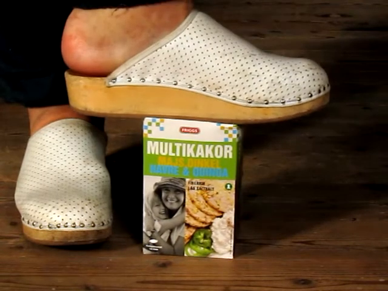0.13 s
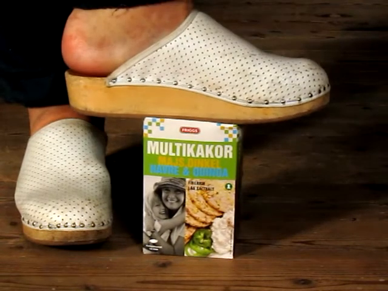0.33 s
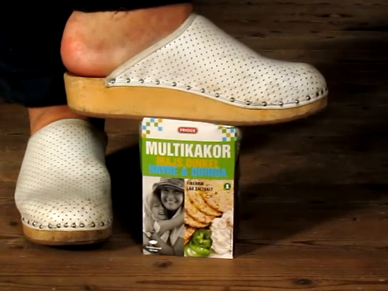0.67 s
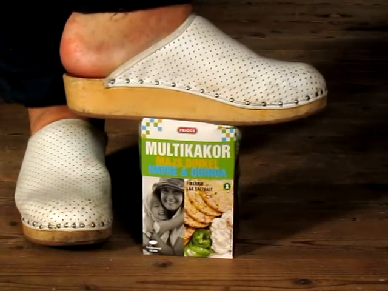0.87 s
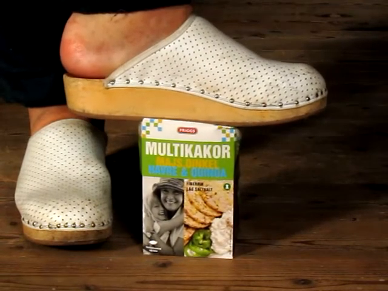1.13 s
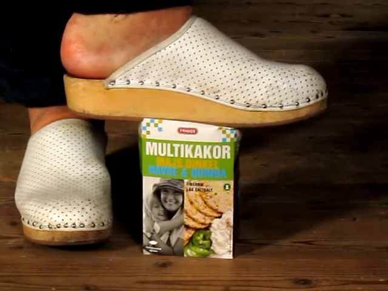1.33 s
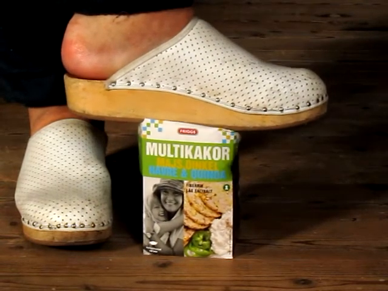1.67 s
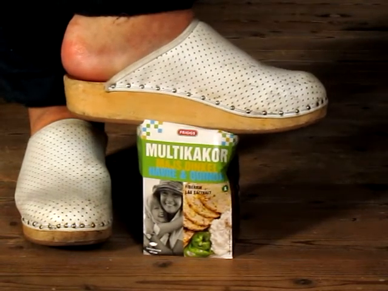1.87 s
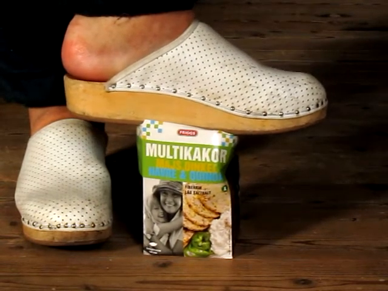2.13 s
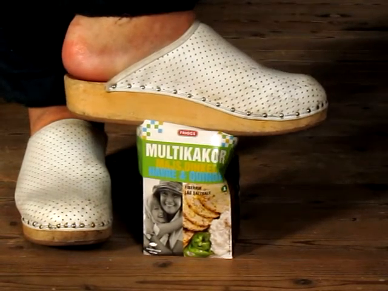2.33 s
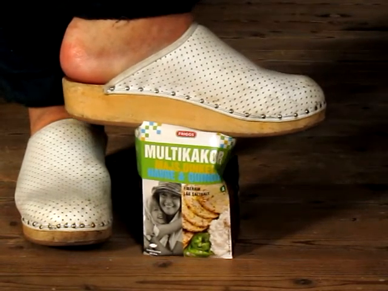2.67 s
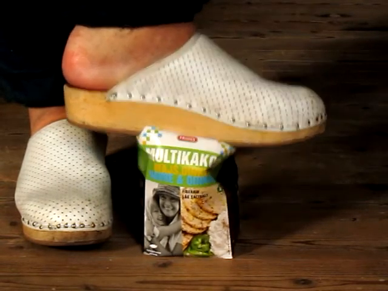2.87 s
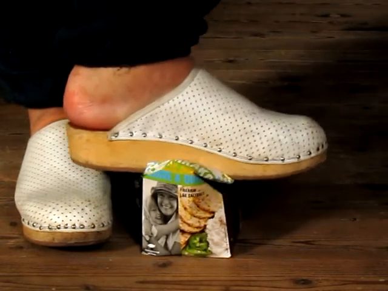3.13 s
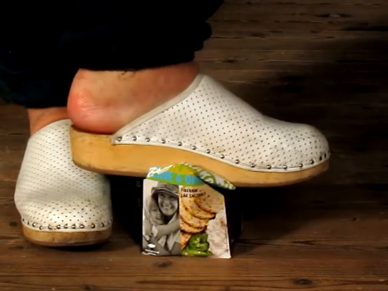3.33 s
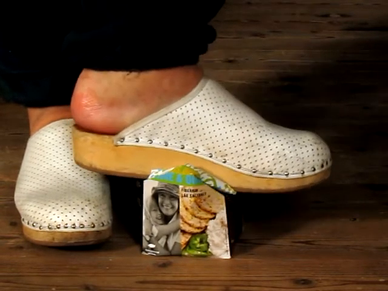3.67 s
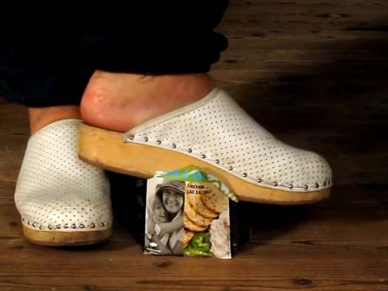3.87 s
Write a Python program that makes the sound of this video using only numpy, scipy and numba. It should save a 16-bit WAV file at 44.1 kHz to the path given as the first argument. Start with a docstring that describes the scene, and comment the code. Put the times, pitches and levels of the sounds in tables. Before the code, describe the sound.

A cardboard box creaks faintly, then crunches and crumples loudly under a slowly pressing wooden clog.

```python
"""On a plank floor in a small room, a wooden clog slowly crushes a small cardboard box close to a stereo camera
microphone. Folds give way in swarms of tiny slips, random clicks that ring the modes of the hollow box.
Single creases snap as short rings, the paper skin crackles and ticks in filtered clicks and noise, and the boards
thud as low decaying sines. Tails of decaying noise answer as the room, over a steady hiss and a wide low rumble."""
import sys
import numpy as np
from scipy import signal
from scipy.fft import rfft, irfft
from scipy.io import wavfile
from scipy.ndimage import uniform_filter1d
from numba import njit

SR = 44100
rng = np.random.default_rng(int(sys.argv[2]) if len(sys.argv) > 2 else 0)


def generate_wav(signal):
    """Clip the signal to [-1, 1] and save it as 16-bit WAV at the path in sys.argv[1]."""
    frames = np.transpose(np.atleast_2d(signal))
    scaled = np.clip(frames, -1, 1) * 32767
    pcm = np.round(scaled).astype(np.int16)
    wavfile.write(sys.argv[1], SR, pcm)


N = 176400  # samples, 4 s

# Modes of the box. Each row: pitch in Hz, relative level in dB, nominal 60 dB decay time in seconds.
BOX_MODES = [(217, -13, 0.063), (290, -2, 0.028), (358, -5, 0.05), (438, -1, 0.061), (585, -3.5, 0.029),
             (762.5, -0.5, 0.027), (921, -4.5, 0.028), (1077, 1, 0.02), (1235, -15, 0.012),
             (1580, -3, 0.01), (1900, -6.5, 0.022), (2255, -8, 0.011), (2628, -15, 0.11),
             (3250, -12, 0.016)]
# Crumpling under the foot, one table a stretch. Each row: time in seconds, level of the middle modes in dB before
# the crumple trim, then the hollow modes, upper modes and paper crackle (before its trim) in dB re the middle.
PUSH_1 = [(0.45, -68, -12, 1, -6), (0.504, -49, 3, -1.5, -16), (0.62, -70, 9, -1, 1)]
CREEP = [(.9, -70, 3.4, 0, -8), (1.04, -63, 4.4, 1.6, -7.5), (1.6, -71.5, 6.8, 0, -7.5)]
PUSH_2 = [(1.619, -66, 8, 5.5, -12), (1.716, -49, 9.5, 6.5, -15.5), (1.816, -51.5, 3, 8, -7.5),
          (1.968, -60.5, 2.5, 0.5, -12), (2.03, -54, 5, 1.5, -14), (2.084, -59.5, 8, -4, -7),
          (2.4, -65, -3, -19, -13), (2.451, -49.5, 2, -8, -27)]
COLLAPSE = [(2.73, -86, 9, -7, -13), (2.754, -49.5, -3.5, -19, -14), (2.842, -55, 14, -12, -7),
            (2.852, -34.5, 10, -3, -21), (2.891, -48, 1, -1, 0.5), (2.897, -35, -2.5, 3, -5),
            (2.932, -33, -8.5, -26, -5.5), (2.967, -30, -2, -6, -13), (3.12, -45, -6, -3.5, -18),
            (3.278, -49.5, -3.5, -9, -15), (3.294, -58, 0, -5, -13), (3.702, -58, 2, 2, -9.5)]
PUSH_4 = [(3.72, -49, -3, -4, -14), (3.762, -46.5, -9, -3.5, -19), (3.79, -32.5, 5, -13, -24),
          (3.798, -23.5, -10, -33, -25), (3.82, -23.5, -8, -24, -23), (3.854, -29, -31, -20, -19),
          (3.884, -37, -14, -4.5, -17.5), (3.981, -54, -26, -12, -14)]
# Creases that snap. Each row: start in seconds, peak in dB before the low cut of the box, favoured pitch in Hz,
# loss in dB one octave off that pitch.
SNAPS = [(.503, -40, 360, 16), (.739, -34.5, 1060, 31), (.739, -37.5, 427, 28), (.738, -44, 2400, 2),
         (1.284, -44, 900, 9), (2.018, -38.5, 1100, 4.5), (2.75, -37.5, 900, 5.5), (2.797, -32, 430, 37),
         (2.85, -19, 420, 5.5), (2.895, -31, 1600, 23), (2.96, -28, 900, 22), (2.967, -19.5, 333, 27),
         (3.415, -46, 900, 20), (3.874, -48, 2060, 20), (3.779, -28.5, 455, -1), (3.787, -33.5, 2640, 62),
         (3.802, -34.5, 2680, 68), (3.7954, -12, 785, 14.5), (3.806, -23, 950, 15), (3.992, -35, 810, 12)]
# Dry ticks of the paper skin. Each row: start in seconds, level in dB before colouring, fizz decay constant in
# seconds.
TICKS = [(1.361, -56, 0.032), (1.954, -53.5, 0.019), (2.457, -53, 0.046), (2.8524, -37.5, 0.0068),
         (2.893, -32, 0.01), (3.8364, -33.5, 0.017)]
# Colour of the paper. Each row: frequency in Hz, relative level in dB per Hz.
PAPER_COLOUR = [(710, -33), (1200, -4.5), (2050, -4.5), (2620, -2.5), (4020, -17), (4830, -9),
                (7810, -13.5), (12900, -33), (15500, -70)]
# Jolts of the sole on the floor boards. Each row: start in seconds, level of each board mode in dB before decay.
THUDS = [(2.845, -40.5), (2.956, -40.5), (3.789, -48)]
# Width of the room tail. Each row: frequency in Hz, side level in dB re the mid.
ROOM_SIDE = [(60, -11.5), (200, -3), (500, -15), (1000, -15), (3000, -5), (8000, 6.5), (15000, 20)]
# Colour of the hiss in the middle. Each row: frequency in Hz, relative level in dB per Hz.
HISS_COLOUR = [(15, -64), (25, -20), (55, -10), (113, -4.5), (156, -5.5), (340, -6), (445, -8),
               (783, -12.5), (1200, -15), (1340, -15), (2930, -21.5), (4150, -31.5), (6050, -26),
               (11200, -42.5), (15500, -64)]
# Colour of the wide rumble, in the side. Each row: frequency in Hz, relative level in dB per Hz.
RUMBLE_COLOUR = [(15, -58), (25, -31), (86, -3), (313, -0.5), (582, -9), (1950, -21.5), (3930, -34.5),
                 (6380, -33), (15500, -59.5)]

# Crumpling
CRUMPLE_DB, BURST_DB, MODE_WALK_DB = -2.5, 1, 1.6  # trim; swell shared by all modes; swell of each mode
SLIPS_PER_S, SLIP_SCATTER_DB = 2500, 2.2
SLIP_CYCLES = 25.5  # a folding wall takes at most this many cycles to fall 60 dB
PITCH_WANDER = .03  # share by which the modes drift while the walls deform
BOX_LOW_HZ = 127  # low cut of the box walls

SNAP_RISE_S, SNAP_SCATTER_DB, SNAP_RING = 0.0004, 3.5, 1.24  # build-up; spread of modes; decay re the table
CRACKS_PER_S, CRACK_SCATTER_DB, CRACKLE_DB = 5000, 2.4, 4
TICK_BRIGHT = 0.7  # treble tilt of the fizz, 0 flat to 1 brightest
PLANK_LOW_HZ, PLANK_HIGH_HZ, PLANK_T60_S, PLANK_RISE_S = 102.4, 162, 0.33, 0.0028

ROOM_T60_S, ROOM_DB, ROOM_DULL_HZ, ROOM_DELAY_S = 0.24, -12.5, 5230, 0.00443
HISS_DB, RUMBLE_DB, FLICKER_DB = -54.5, -46, .6
TOP_HZ = 15500


def undb(db):
    """Turn dB into amplitude."""
    return 10 ** (np.asarray(db) / 20)


def unit(x):
    """Scale to rms 1."""
    return x / np.sqrt(np.mean(x ** 2))


def colour(x, points):
    """Filter along a curve of (Hz, dB) points, straight on a log frequency axis."""
    point_hz, point_db = np.array(points, float).T
    hz = np.maximum(np.arange(len(x) // 2 + 1) * SR / len(x), 1)
    curve_db = np.interp(np.log(hz), np.log(point_hz), point_db, left=-70)
    return irfft(rfft(x) * undb(curve_db), len(x))


def walk(rate):
    """Random levels, each held 1 / rate seconds and slewed to the next; spread near 1."""
    hold = int(SR / rate)
    steps = np.repeat(rng.standard_normal(N // hold + 1), hold)
    return uniform_filter1d(steps, hold)[:N] * 1.2


def clicks(rate, scatter_db):
    """Random clicks of either sign, a few much larger than most; rms 1."""
    when, sign, size = rng.random((int(rate * N / SR), 3)).T
    out = np.zeros(N)
    out[(when * N).astype(int)] = np.sign(sign - .5) * undb(-scatter_db * np.log(1.002 - size))
    return unit(out)


@njit
def resonate(x, turn):
    """A decaying phasor whose pitch may move every sample; a unit click rings at amplitude 1."""
    y, z = np.empty(len(x)), 0j
    for i in range(len(x)):
        z = z * turn[i] + x[i] + 1e-18  # the tiny offset keeps silence numerically cheap
        y[i] = z.imag
    return y


def pushes():
    """The foot's pressure as gains over time: hollow, middle and upper modes, then paper crackle."""
    t = np.arange(N) / SR
    gains = np.zeros((4, N))
    for rows in (PUSH_1, CREEP, PUSH_2, COLLAPSE, PUSH_4):
        s, db, hollow, upper, crackle = np.array(rows, float).T
        fade = np.clip(np.minimum(t - s[0], s[-1] - t) / .01, 0, 1)  # 10 ms in and out
        levels_db = [np.interp(t, s, v) for v in (db + hollow, db, db + upper, db + crackle)]
        gains += fade * undb(levels_db)
    return gains


def crumple(gains):
    """Swarms of slips ring the box; each mode drifts, swells and fades as the folds move."""
    rung, power = np.zeros((3, N)), np.zeros((3, 1))
    bursts_db = BURST_DB * walk(250)
    for hz, db, t60 in BOX_MODES:
        group = np.searchsorted((650, 1400), hz)  # edges in Hz between hollow, middle and upper modes
        ring_s = min(t60, SLIP_CYCLES / hz)
        decay = np.exp(-np.log(1000) / (ring_s * SR))
        moving_hz = hz * (1 + PITCH_WANDER * walk(30))
        turn = decay * np.exp(2j * np.pi * moving_hz / SR)

        slips = clicks(SLIPS_PER_S, SLIP_SCATTER_DB)
        drive = slips * undb(db + MODE_WALK_DB * walk(60) + bursts_db)
        ring = resonate(drive * gains[group], turn)
        # a small wall radiates little below its own pitch
        small = signal.butter(2, hz / 2, "high", fs=SR)
        rung[group] += signal.lfilter(*small, ring)
        power[group] += np.mean(drive ** 2) / (2 * (1 - decay * decay))  # expected at a gain of 1
    return undb(CRUMPLE_DB) * (rung / np.sqrt(power)).sum(axis=0)


def snaps():
    """Each snapping crease rings the box once and favours the modes near its own pitch."""
    hz, mode_db, t60 = np.array(BOX_MODES, float).T[:, :, None]
    t = np.arange(SR // 5) / SR
    out = np.zeros(N + SR)
    rings = -np.sin(2 * np.pi * hz * t) * undb(mode_db - 60 * t / (t60 * SNAP_RING))
    build_up = (1 - np.exp(-t / SNAP_RISE_S)) ** 2
    for s, db, pitch, focus_db in SNAPS:
        scatter_db = SNAP_SCATTER_DB * rng.standard_normal((len(hz), 1))
        loss_db = focus_db * np.log2(hz / pitch) ** 2
        snap = (rings * undb(scatter_db - loss_db)).sum(axis=0) * build_up
        out[int(s * SR):][:len(t)] += snap * undb(db) / abs(snap).max()
    return out[:N]


def paper(gain):
    """Dense fine crackle of clicks while the card folds, and lone ticks of decaying noise fizz."""
    tick_env = np.zeros(N)
    for s, db, length in TICKS:
        i = int(s * SR)
        tick_env[i:] += undb(db) * np.exp(-np.arange(N - i) / (length * SR))
    fine = clicks(CRACKS_PER_S, CRACK_SCATTER_DB)
    scale = 1 / colour(fine, PAPER_COLOUR).std()
    fizz = signal.lfilter([1, -TICK_BRIGHT], [1], rng.standard_normal(N)) * fine.std()
    crackle = undb(CRACKLE_DB) * gain * fine
    return scale * colour(crackle + tick_env * fizz, PAPER_COLOUR)


def planks():
    """The jolted floor boards thud in two low modes that build up fast and die away."""
    t = np.arange(N) / SR
    out = np.zeros(N)
    for s, db in THUDS:
        after = np.maximum(t - s, 0)
        env = (1 - np.exp(-after / PLANK_RISE_S)) * undb(db - 60 * after / PLANK_T60_S)
        for hz in (PLANK_LOW_HZ, PLANK_HIGH_HZ):
            out += np.sin(2 * np.pi * hz * after) * env
    return out


def room(x):
    """The small room answers with separate mid and side tails of decaying, dulled noise."""
    t = np.arange(SR // 2) / SR
    tails = rng.standard_normal((2, len(t))) * undb(-60 * t / ROOM_T60_S) * (t > ROOM_DELAY_S)
    tails = signal.lfilter(*signal.butter(1, ROOM_DULL_HZ, fs=SR), tails)
    tails *= undb(ROOM_DB) / np.sqrt((tails ** 2).sum(axis=1, keepdims=True))
    mid, side = (signal.fftconvolve(x, tail)[:N] for tail in tails)
    return mid, colour(side, ROOM_SIDE)


def background():
    """Coloured noise: steady hiss in the middle and a wide low rumble, both flickering a little."""
    hiss = unit(colour(rng.standard_normal(N), HISS_COLOUR))
    rumble = unit(colour(rng.standard_normal(N), RUMBLE_COLOUR))
    hiss *= undb(HISS_DB + FLICKER_DB * walk(8.6))
    rumble *= undb(RUMBLE_DB + FLICKER_DB * walk(6.22))
    return hiss, rumble


def scene():
    """Box and boards in the middle, the room around them, hiss and rumble beneath."""
    gains = pushes()
    low_cut = signal.butter(3, BOX_LOW_HZ, "high", fs=SR, output="sos")
    walls = signal.sosfilt(low_cut, crumple(gains) + snaps())
    box = walls + paper(gains[3]) + planks()
    wet, wet_side = room(box)
    hiss, rumble = background()
    mid = box + wet + hiss
    side = wet_side + rumble
    return np.array([mid + side, mid - side])  # left, right


def record(dry):
    """The camera cuts the top with a steep low-pass."""
    top_cut = signal.ellip(10, .2, 80, TOP_HZ, fs=SR, output="sos")  # 0.2 dB ripple, 80 dB down
    return signal.sosfilt(top_cut, dry)


dry = scene()
out = record(dry)
generate_wav(out)
```